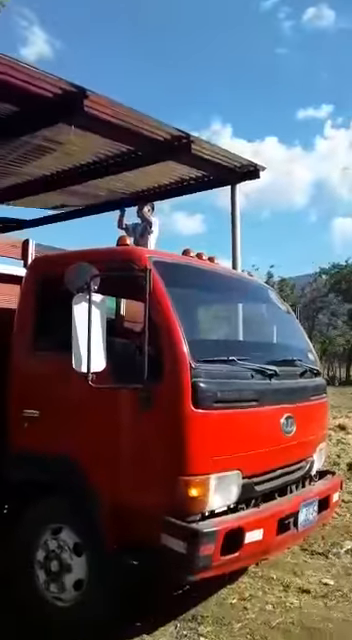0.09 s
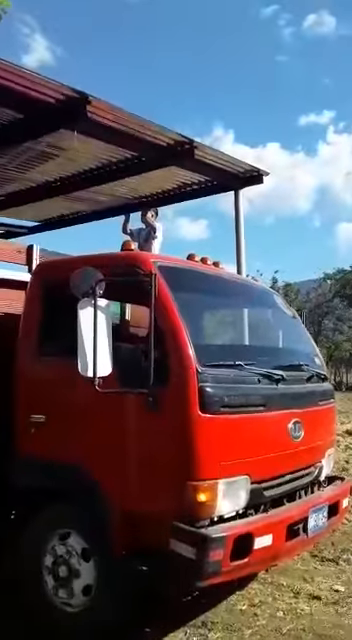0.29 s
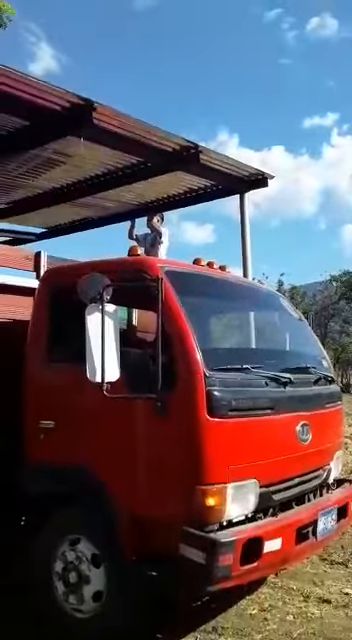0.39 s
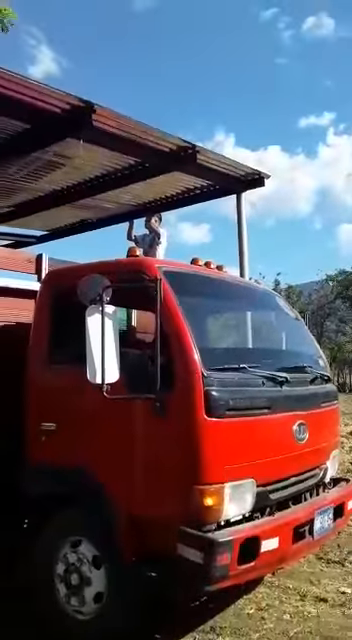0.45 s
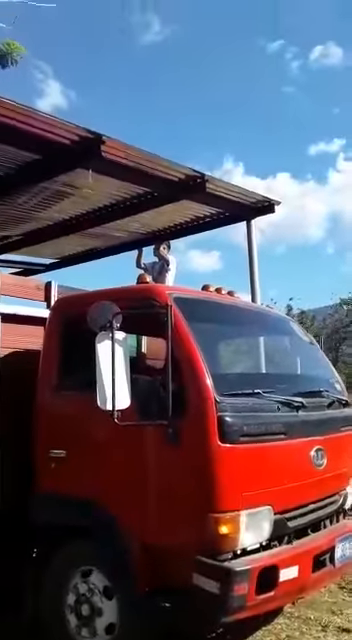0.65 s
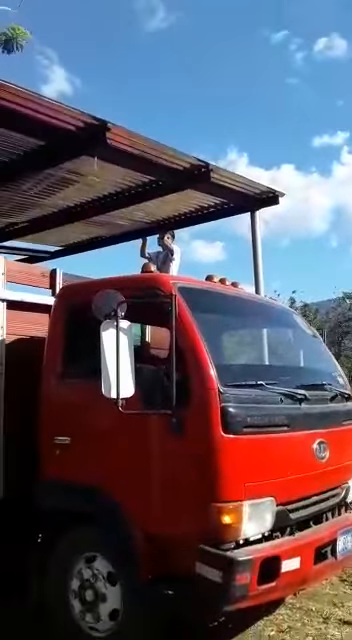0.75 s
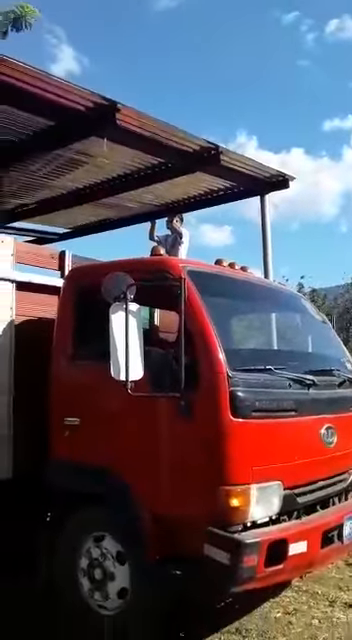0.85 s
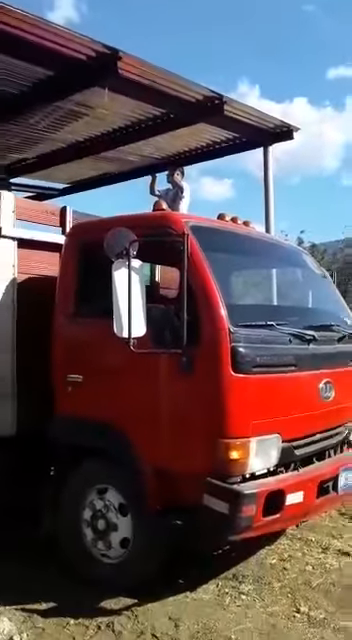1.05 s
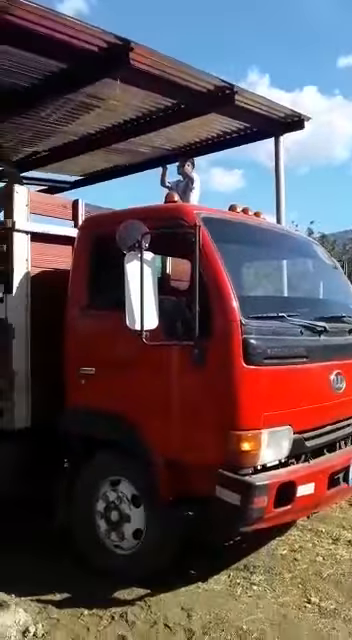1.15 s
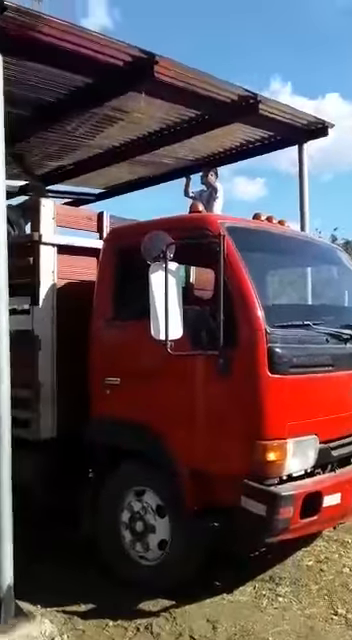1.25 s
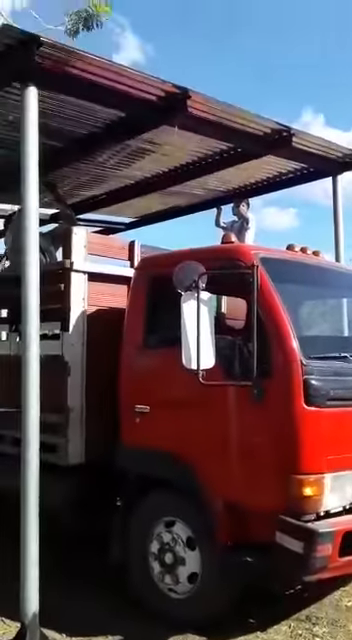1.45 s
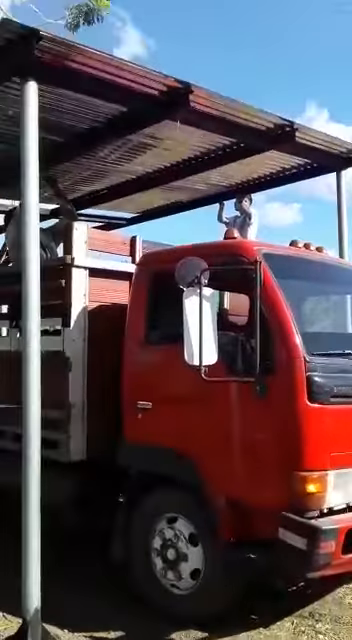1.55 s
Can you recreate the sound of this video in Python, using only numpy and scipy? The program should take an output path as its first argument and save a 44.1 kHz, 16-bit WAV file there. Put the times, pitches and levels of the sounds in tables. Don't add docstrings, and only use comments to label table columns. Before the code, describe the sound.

A corrugated metal roof sheet buckles in one loud sudden crash, then rattles down outdoors

```python
import sys
import numpy as np
from scipy import signal
from scipy.fft import rfft, irfft, next_fast_len
from scipy.io import wavfile

SR = 44100
rng = np.random.default_rng(int(sys.argv[2]) if len(sys.argv) > 2 else 0)


def int16_out(signal):
    q = np.round(np.clip(np.atleast_2d(signal).T, -1, 1) * 32767)
    wavfile.write(sys.argv[1], SR, q.astype(np.int16))


def amplitude_ratio(level_db):
    exponent = np.asarray(level_db, float) / 20
    return 10 ** exponent


N = 70560

# pitch_hz, level_db (per Hz)
YARD_COLOUR = [(30, -1), (215, -7), (540, -5.5), (1600, -13.5), (3000, -11.5), (8400, -20.5), (9700, -32.5),
               (16300, -31)]
# start_s, level_db, pitch_hz,
# t60_s
CONTACT_TICKS = [(.005, -48, 2100, 0.28), (.111, -54, 2870, .2), (0.236, -29, 5650, 0.044),
                 (.237, -46, 13000, .04), (0.293, -39, 7900, 0.17), (.36, -16.5, 3670, 0.17),
                 (.466, -44, 4800, .05), (0.601, -27.5, 3670, 0.079), (.738, -38, 8000, .15),
                 (.738, -53, 14100, .15), (.813, -82, 15000, .06), (0.855, -44, 13000, 0.075),
                 (.93, -52, 4300, 0.13), (.935, -44, 5740, 0.053), (.975, -45.5, 2150, 0.13),
                 (1.098, -45, 3230, .12), (1.166, -62, 14500, 0.079), (1.181, -48, 3430, 0.46),
                 (1.199, -48, 1060, 0.57), (1.257, -46, 2700, .2), (1.245, -49, 7500, 0.2),
                 (1.3, -45, 3240, .15), (1.436, -50, 2840, 0.14), (1.515, -50, 7600, .1),
                 (.24, -23, 155, 0.16), (.288, -18.5, 245, 0.33), (.285, -17.5, 701, 0.35),
                 (.368, -14.5, 1180, 0.13), (.218, -39, 554, .07), (1.19, -35, 59.5, 0.22)]
# pitch_hz, level_db, t60_s
CLEAR_MODES = [(155, -27, .15), (245, -16, 0.45), (507.3, 1, 0.6), (574, 5, 0.17), (672.3, 4, 0.15),
               (720, -14, 0.17), (1173, -25, .2), (2070, -21, 0.13), (2760, 6, 0.079), (3000, -2, 0.28),
               (3400, -48, .15), (4220, -53, .15)]
# pitch_hz, level_db (per Hz)
BOOM_COLOUR = [(125, -24), (160, -10), (250, -5.5), (350, -8.5), (650, -0.5), (930, -10), (1160, -6.5),
               (1600, -16)]
# pitch_hz, level_db (per Hz)
CLANG_COLOUR = [(940, -37), (1600, -12.5), (2470, -8), (2740, -6), (3880, -8), (6850, -16.5), (8150, -14.5),
                (9880, -26), (16000, -23.5)]
# pitch_hz, t60_s
RING_TIMES = [(60, 0.95), (250, 0.64), (700, 0.63), (2000, 0.64), (4000, 0.56), (8000, .5), (15000, 0.31)]
# start_s, level_db, brightness_db_per_octave, length_s
SHEET_THUDS = [(0.0, -43, -3.5, 0.034), (.12, -53, 3, .03), (.218, -41, -9.5, 0.0029),
               (.236, -19.5, -2, 0.0044), (.245, -16.5, -3.5, 0.0057), (.256, -16, -2, 0.021),
               (.285, -16.5, 4, .02), (.33, -18.5, 0, .02), (.37, -21, 2.5, .02), (.415, -17, -1.5, .03),
               (.47, -26, 3, 0.027), (.52, -24, -0.5, .04), (.59, -34, -5.5, .03), (.65, -43.5, 7, 0.018),
               (.73, -38, 0.5, 0.027), (.825, -42.5, -1.5, 0.0097), (.857, -46.5, -7.5, 0.0059),
               (.91, -46.5, 0, .03), (.98, -51, 1, 0.021), (1.12, -61, 9, 0.048),
               (1.262, -38.5, -0.5, .035), (1.32, -41.5, -3, 0.018), (1.357, -39.5, -4.5, .04),
               (1.443, -42, -2, .014), (1.48, -73, -4, .03)]
# start_s, level_db, brightness_db_per_octave, length_s
RIB_CLANGS = [(0.0, -43.5, 0, 0.0034), (.015, -48.5, -0.5, 0.035), (.110, -43, -4, 0.013),
              (.21, -46.5, -2, 0.029), (.236, -25.5, 0.5, 0.0052), (.245, -15, -6.5, 0.0075),
              (.256, -12.5, -2.5, 0.034), (.292, -11, -2, 0.032), (.33, -11.5, -1.5, .03),
              (.36, -18, -0.5, .03), (.43, -19.5, -3, .03), (.466, -23, 1.5, 0.018), (.52, -27, -2, .04),
              (.600, -30.5, -1.5, .015), (.65, -41, 0.5, 0.018), (.737, -38, 1.5, .012),
              (.812, -37.5, 1, 0.027), (.855, -47, 4.5, 0.0066), (.92, -43, 1, .03), (1.09, -52, 0, .01),
              (1.109, -46.5, 0.5, 0.0084), (1.165, -43.5, 2.5, 0.039), (1.24, -38, 1, .04),
              (1.28, -39.5, 0, 0.047), (1.36, -43.5, 0, 0.034), (1.425, -41, 1.5, 0.039),
              (1.514, -46, 0.5, 0.017)]

SPLIT_HZ = 1600
PLACES = 6
GRAINS = 48


def at_hz(points, hz):
    table_hz, value = np.transpose(points)
    return np.interp(np.log(hz), np.log(table_hz), value)


def bin_hz():
    return np.maximum(np.arange(N // 2 + 1) * SR / N, 1)


def coloured(colour, low_hz, high_hz):
    hz = bin_hz()
    inside = (hz >= low_hz) * (hz < high_hz)
    spectrum = rfft(rng.standard_normal(N)) * amplitude_ratio(at_hz(colour, hz)) * inside
    return spectrum / np.std(irfft(spectrum, N))


def yard():
    level_db = -48.5
    return amplitude_ratio(level_db) * irfft(coloured(YARD_COLOUR, 20, 17000), N)


def buzzes():
    width, attack_cycles = 0.086, 2.7
    t = np.arange(SR // 4) / SR
    out = np.zeros(N + SR)
    for start_s, level_db, hz, t60_s in CONTACT_TICKS:
        noise = rng.standard_normal(len(t))
        radius, angle = np.exp(-np.pi * width * hz / SR), 2 * np.pi * hz / SR
        for _ in range(2):
            noise = signal.lfilter([1, 0, -1], [1, -2 * radius * np.cos(angle), radius ** 2], noise)
        attack = 1 - np.exp(-t * hz / attack_cycles)
        shape = amplitude_ratio(level_db - 60 * t / t60_s) * attack
        buzz = shape * noise
        start = int(start_s * SR)
        out[start:start + len(t)] += buzz * np.std(shape) / np.std(buzz)
    return out[:N]


def whip():
    start_s, length_s, level_db = 0.252, 0.024, -14
    from_hz, to_hz, roughness_hz = 3300, 5400, 450
    progress = np.clip((np.arange(N) / SR - start_s) / length_s, 0, 1)
    phase = 2 * np.pi * np.cumsum(from_hz + (to_hz - from_hz) * progress) / SR
    lowpass = signal.butter(2, roughness_hz, fs=SR, output="sos")
    rough = signal.sosfilt(lowpass, rng.standard_normal((2, N)))
    rough = rough / np.std(rough)
    tone = rough[0] * np.sin(phase) + rough[1] * np.cos(phase)
    return amplitude_ratio(level_db) * np.sin(np.pi * progress) * tone


def impacts(contacts):
    unevenness_db = 3.5
    start_s, _, _, length_s = np.transpose(contacts)
    jitter, luck, sign, spot = rng.random((4, len(start_s), GRAINS))
    progress = (np.arange(GRAINS) + jitter) / GRAINS
    where = ((start_s[:, None] + length_s[:, None] * progress) * SR).clip(0).astype(int)
    size = amplitude_ratio(-unevenness_db * np.log(1 - luck)) * np.sign(sign - 0.5)
    size = size / np.sqrt(np.sum(size ** 2, axis=1, keepdims=True))
    return where, size, (spot * PLACES).astype(int)


def train(hz, thuds, clangs):
    if hz < SPLIT_HZ:
        contacts, pivot_hz, hits = SHEET_THUDS, 500, thuds
    else:
        contacts, pivot_hz, hits = RIB_CLANGS, 3000, clangs
    where, size, place = hits
    _, level_db, brightness_db, _ = np.transpose(contacts)
    level = amplitude_ratio(level_db + brightness_db * np.log2(hz / pivot_hz))
    clicks = np.zeros((PLACES, N))
    np.add.at(clicks, (place, where), size * level[:, None])
    return clicks


def clear_modes(thuds, clangs):
    all_modes_db = -9.5
    out = np.zeros(N)
    for hz, level_db, t60_s in CLEAR_MODES:
        radius, angle = amplitude_ratio(-60 / (t60_s * SR)), 2 * np.pi * hz / SR
        clicks = train(hz, thuds, clangs).sum(axis=0) * amplitude_ratio(level_db + all_modes_db)
        poles = [1, -2 * radius * np.cos(angle), radius ** 2]
        out += signal.lfilter([0, np.sin(angle)], poles, clicks + 1e-18)
    return out


def plate(thuds, clangs):
    sizzle_t60_s, ring_db = 0.1, -0.5
    swell_cycles = 0.54
    modes = coloured(BOOM_COLOUR, 20, SPLIT_HZ) + coloured(CLANG_COLOUR, SPLIT_HZ, 17000)
    hz, t = bin_hz(), np.arange(SR) / SR
    size = next_fast_len(N + SR)
    out = 0
    for centre_hz in SPLIT_HZ * 2 ** np.arange(-5.25, 3.5, 0.5):
        window = np.cos(np.clip(np.log2(hz / centre_hz) * 2, -1, 1) * np.pi / 2) ** 2
        band = irfft(modes * window, N)
        sizzle_power = amplitude_ratio(-120 * t / sizzle_t60_s)
        ring_power = amplitude_ratio(2 * ring_db - 120 * t / at_hz(RING_TIMES, centre_hz))
        swell = 1 - np.exp(-t * centre_hz / swell_cycles)
        stirred = np.array([np.roll(band, k * N // PLACES)[:SR] for k in range(PLACES)])
        response = stirred * np.sqrt(sizzle_power + ring_power) * swell
        clicks = train(centre_hz, thuds, clangs)
        out = out + np.sum(rfft(response, size) * rfft(clicks, size), axis=0)
    return irfft(out, size)[:N]


def scene():
    thuds, clangs = impacts(SHEET_THUDS), impacts(RIB_CLANGS)
    background = yard() + buzzes()
    sheet = whip() + clear_modes(thuds, clangs) + plate(thuds, clangs)
    return (background + sheet)[None]


def band_limit(x):
    return signal.sosfilt(signal.butter(12, 16290, fs=SR, output="sos"), x)


def record(dry):
    ceiling, low_hz, top_hz = 1.5, 108, 16240
    rounded = ceiling * np.tanh(dry / ceiling)
    thinned = signal.sosfilt(signal.butter(2, low_hz, "high", fs=SR, output="sos"), rounded)
    mix = signal.sosfilt(signal.cheby2(24, 66, top_hz, fs=SR, output="sos"), thinned)
    return band_limit(mix)


dry = scene()
out = record(dry)
int16_out(out)
```